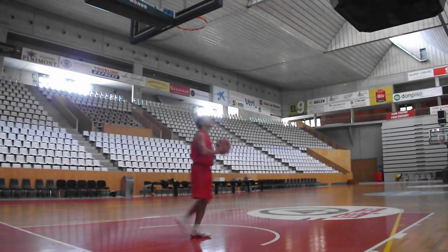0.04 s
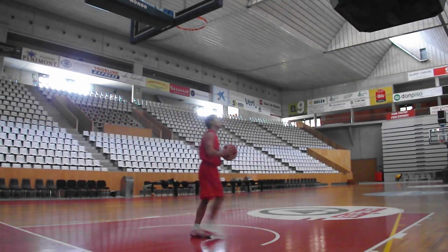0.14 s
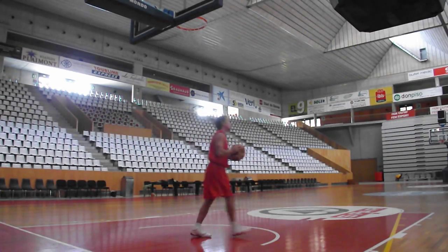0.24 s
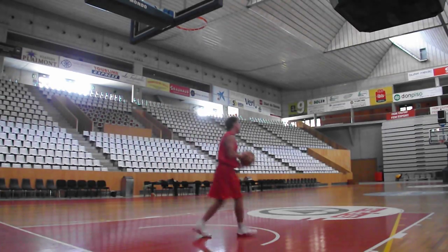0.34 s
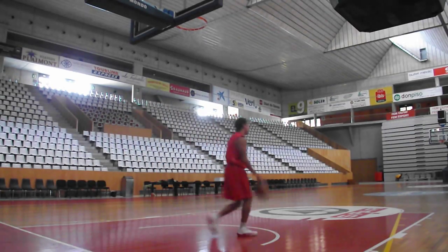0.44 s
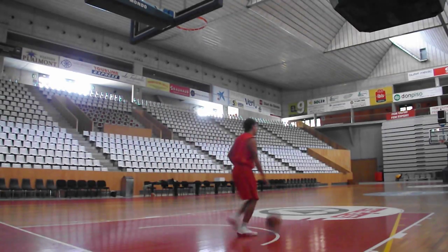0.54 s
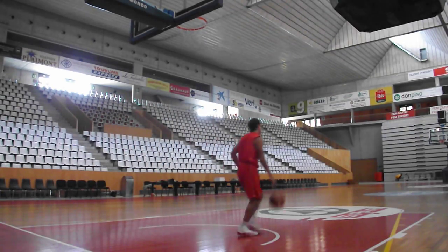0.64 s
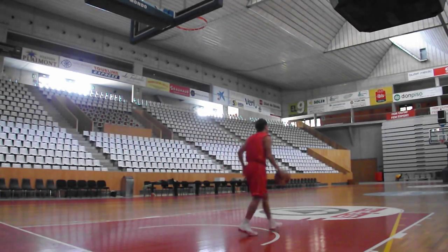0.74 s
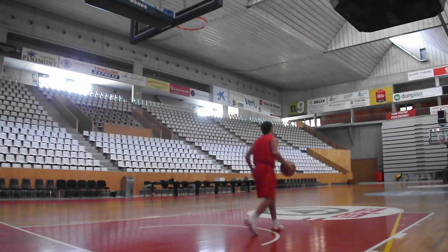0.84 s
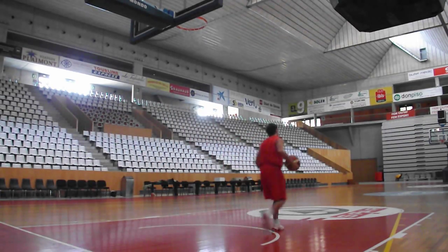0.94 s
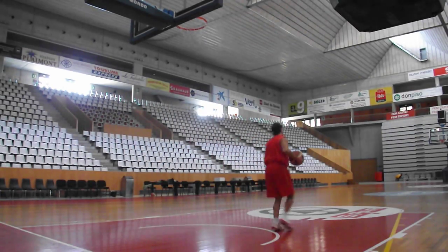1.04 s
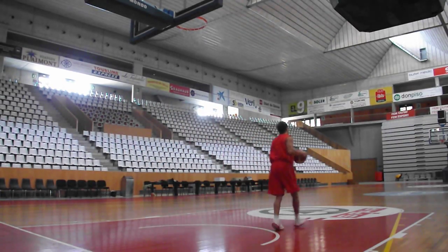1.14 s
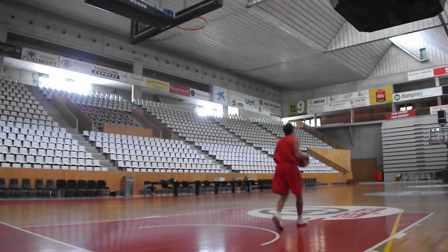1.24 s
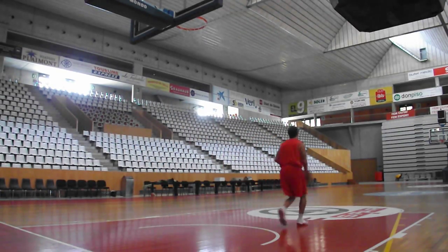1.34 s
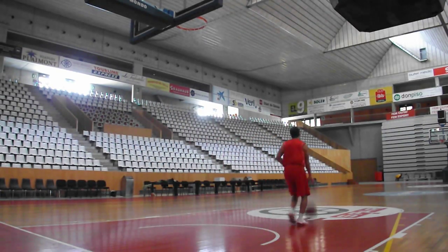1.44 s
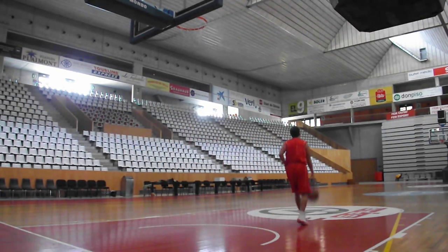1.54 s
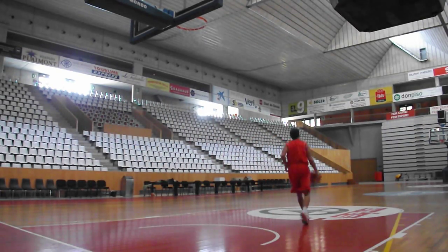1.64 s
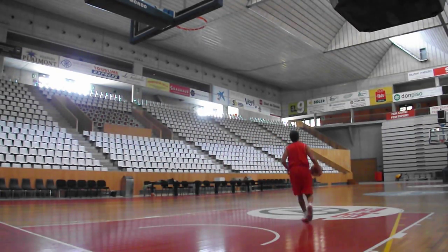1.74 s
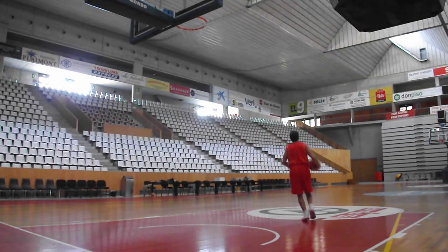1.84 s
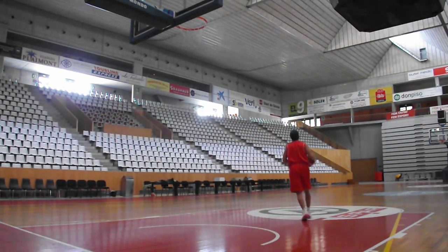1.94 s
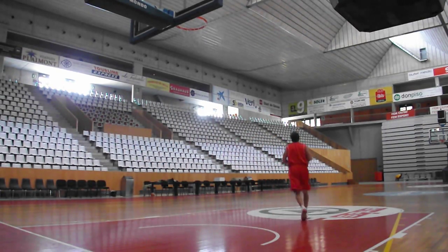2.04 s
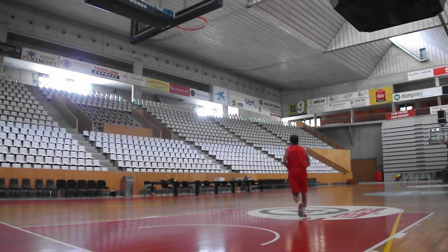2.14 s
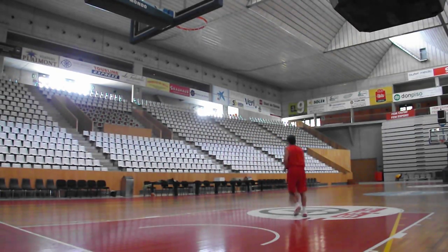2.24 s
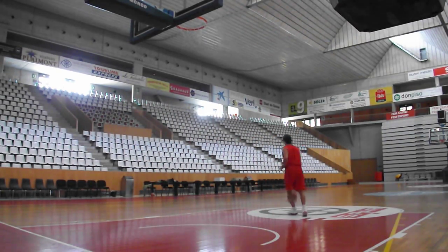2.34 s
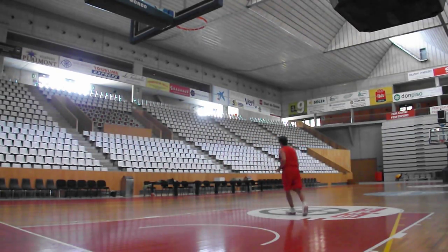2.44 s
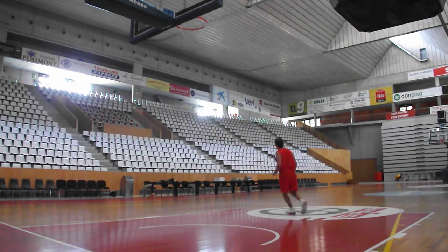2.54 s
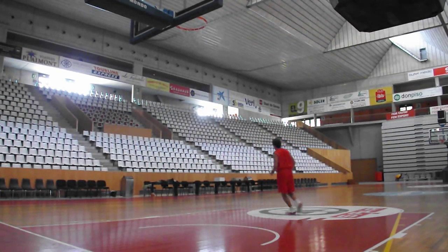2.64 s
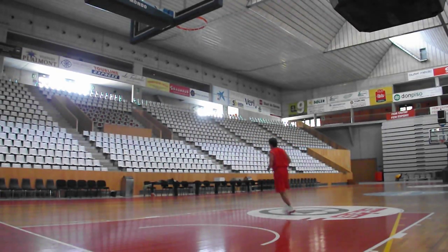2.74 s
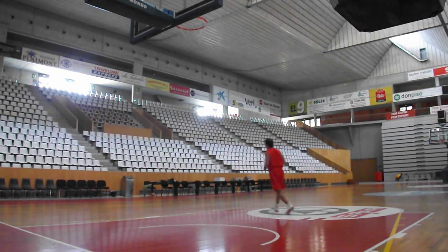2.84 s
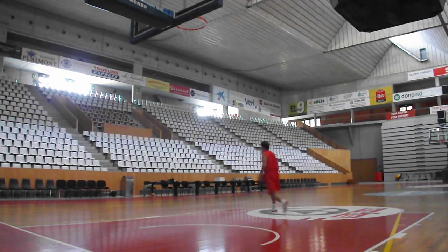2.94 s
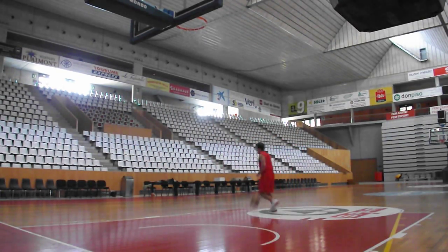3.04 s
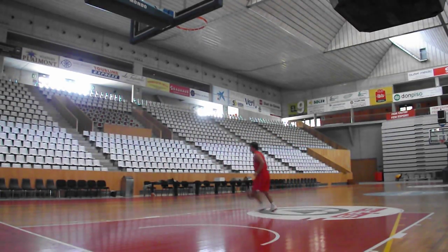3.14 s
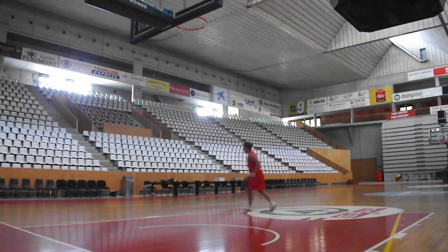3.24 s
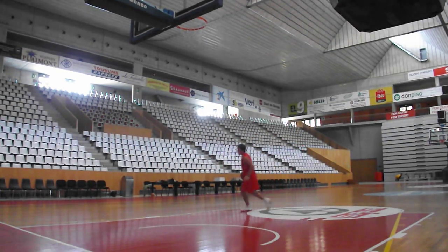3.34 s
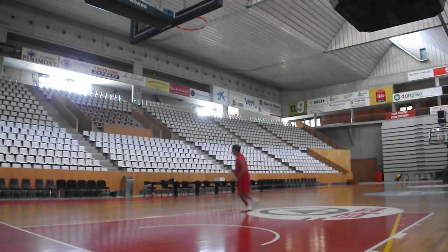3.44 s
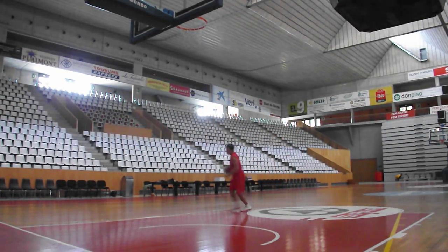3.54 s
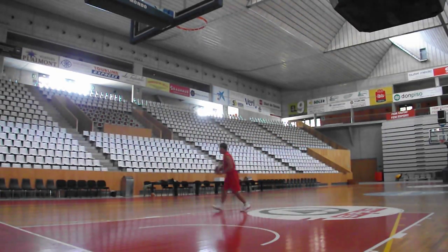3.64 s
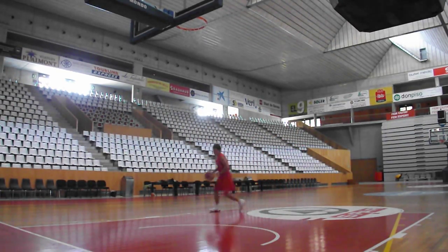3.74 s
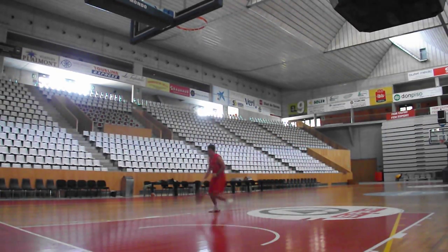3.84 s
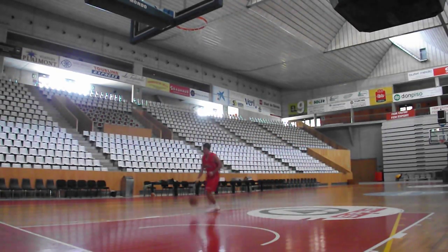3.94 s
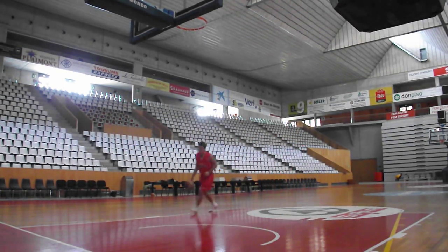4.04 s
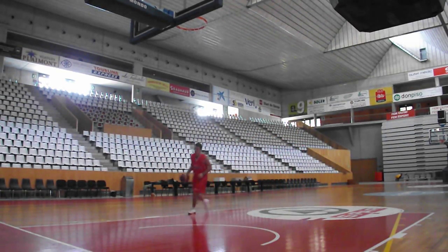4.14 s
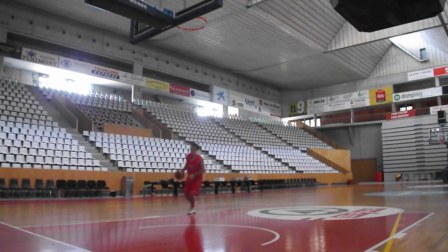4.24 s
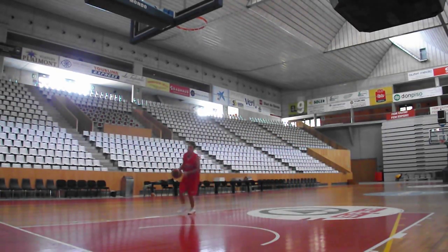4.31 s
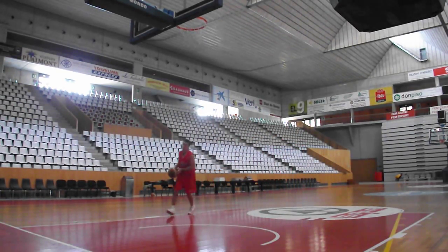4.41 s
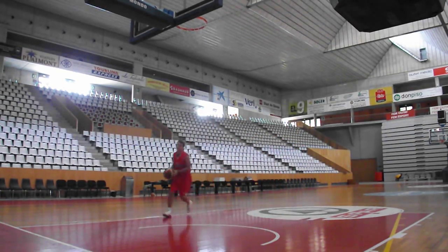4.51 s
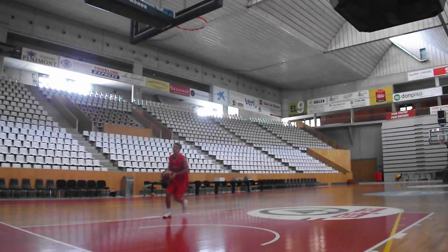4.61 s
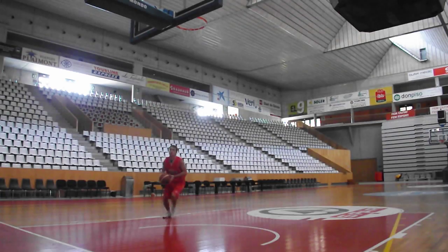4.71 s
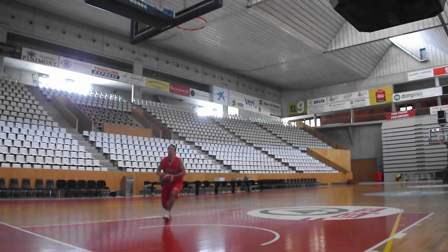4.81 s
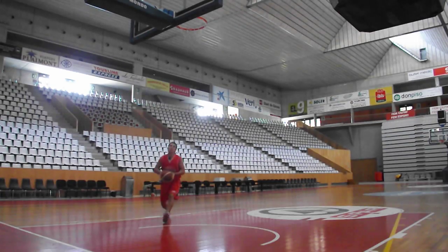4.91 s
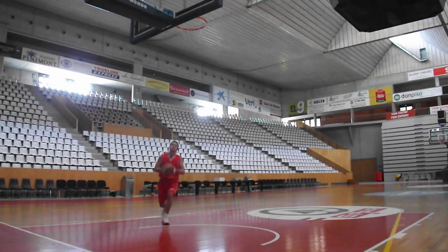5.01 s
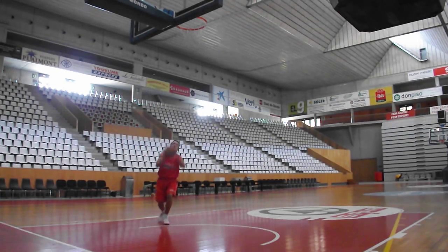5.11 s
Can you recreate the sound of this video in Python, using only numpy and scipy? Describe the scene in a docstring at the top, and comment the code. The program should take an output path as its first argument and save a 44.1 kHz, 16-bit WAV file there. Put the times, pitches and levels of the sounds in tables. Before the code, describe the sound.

A large, empty sports hall hums with steady ventilation rumble, a little hiss and the faint whine of a camera motor. In the first 0.3 seconds, soft steps tap and scuff on wooden boards. A basketball then bounces five times at a slow, fairly even pace, at about 0.6, 1.5, 2.3, 3.1 and 3.9 seconds. Each bounce is a loud, sharp rubber slap over a deep thump, with a brief ring and rattle from ball and floor. The slaps overload the microphone. Walls and roof throw back quick echoes, and the hall rings on for two to three seconds, filling the gaps. The ball moves gradually further away, so later bounces are a little less direct while the reverberation stays strong and turns slightly duller. At about 4.9 seconds the ball lands softly in the hands as the last echo fades.

```python
"""Sharp slaps over a deep thump: a basketball dribbled five times in a large, empty sports hall.
The rubber skin makes the slap; ball and sprung wooden floor flex together for the thump.
Walls and roof throw each bounce back, then the hall rings on, as the player moves further away.
Soft steps lead in and a catch ends it, over ventilation rumble and a camera motor's faint whine.
The slaps overload the microphone."""
import sys
import numpy as np
from scipy import signal
from scipy.fft import rfft, irfft
from scipy.io import wavfile

SR = 44100
rng = np.random.default_rng(int(sys.argv[2]) if len(sys.argv) > 2 else 0)


def log_audio(samples):
    """Write samples as a 16-bit WAV file to the path given in sys.argv[1]."""
    # one column per channel
    frames = np.atleast_2d(samples).T
    # limit to full scale, then quantise
    limited = np.clip(frames, -1, 1)
    pcm = np.round(limited * 32767).astype(np.int16)
    wavfile.write(sys.argv[1], SR, pcm)


N = 227952

# The bounces, before distance. Each row: start in seconds, slap in dB, slap cut-off in Hz, skin ping boost,
# thump, ring and rattle in dB, then the echo off the stands: delay in seconds, level in dB.
BOUNCES = [(0.5548, 8.5, 14000, -1, -0.5, -18.5, -14, .114, -37),
           (1.4712, 10, 14000, -1, -0.5, -25.5, -17.5, .0957, -15),
           (2.314, 10.5, 20000, -1.5, -2, -21, -16.5, 0.1, -29),
           (3.0789, 11, 18000, 3.5, -0.5, -21, -18, 0.085, -25),
           (3.9209, 11.5, 6450, -2, -1.5, -15, -11.5, 0.17, -21)]
# The player's path. Each row: time in seconds, distance from the listener in metres.
DISTANCE = [(.55, 7), (1.47, 7.6), (2.31, 9.2), (3.08, 11.1), (3.92, 11.9)]
# Tone of rubber skin hitting the boards. Each row: frequency in Hz, relative level in dB.
SLAP_COLOUR = [(60, -3), (200, 8.5), (400, -1), (600, -5), (1100, -3), (1700, 2), (2150, 4), (2550, 8.5),
               (3050, 12), (3500, 3), (4300, -5.5), (5700, -14), (8000, -23.5), (15000, -58)]
# Modes of the boards and the air in the ball. Each row: pitch in Hz, relative level in dB, t60 in seconds.
RING_MODES = [(142.8, 2, 0.14), (392, -4.5, 0.078), (500, -8.5, 0.02), (900, -39, 0.075),
              (1172, -9.5, 0.096), (1320, 3.5, 0.021), (1760, -16, 0.051), (2393, 1, 0.029),
              (2890, -3, 0.066), (3280, -0.5, 0.064)]
# Tone of the boards rattling round the impact. Each row: frequency in Hz, relative level in dB.
RATTLE_COLOUR = [(60, 6), (170, 4.5), (400, -6), (600, -1), (1100, 6.5), (1800, -1.5), (3000, -19.5),
                 (4500, -16.5), (8000, -36), (15000, -67)]
# Shoes on boards, hands on the ball. Each row: start in seconds, slap, scuff and thump in dB, thump in Hz.
TOUCHES = [(0.031, -31, -54, -57, 120), (.092, -60, -35.5, -38, 60.5), (0.308, -31, -47, -30.5, 154),
           (4.9205, -18.5, -34.5, -23, 149)]
# Slapback off the rear, side and end walls. Each row: delay in seconds, its change per metre past
# REFERENCE_M, level in dB, its change per metre, scatter in dB.
WALLS = [(.0372, -.0005, -16, -.2, -18), (.0665, -.0031, -21.5, .8, -16), (.365, .001, -37, 1.3, -12)]
# Tone of the reverb. Each row: frequency in Hz, relative level in dB.
HALL_COLOUR = [(25, 10), (52, 13), (90, -16), (160, 0.5), (250, 2), (400, -4.5), (600, 1.5), (1100, -0.5),
               (1800, -2.5), (2800, -4), (4500, -6), (7000, -7.5), (12000, -19)]
# Length of the reverb. Each row: frequency in Hz, t60 in seconds.
HALL_DECAY = [(60, 3.42), (200, 2.7), (1100, 2.99), (2800, 2.05), (5000, 1.55), (8000, 1.67), (14000, .4)]
# Broad returns off the far seats and end wall. Each row: delay and width in seconds, boost in dB,
# frequency in Hz below which the boost fades.
HALL_SWELLS = [(0.182, 0.067, 4, 4570), (.36, 0.04, 2, 25)]
# Ventilation rumble and microphone hiss. Each row: frequency in Hz, relative level in dB.
VENT_COLOUR = [(12, -43), (20, -0.5), (58, 6), (110, -13.5), (230, -17.5), (340, -24.5), (800, -26),
               (1270, -24), (1650, -22), (2050, -28), (3200, -26.5), (4400, -32), (5400, -43.5),
               (15500, -45)]
# Narrow bands of faint whine from the camera's motor. Each row: centre in Hz, width in Hz, rms level in dB.
CAMERA_WHINE = [(1460, 130, -55), (1850, 140, -56.5), (3280, 260, -73), (4300, 380, -65.5)]

HZ = np.fft.rfftfreq(2 ** 18, 1 / SR)  # frequency grid for filters
AGE = np.arange(SR // 4) / SR  # seconds since a hit
REFERENCE_M = 7  # the direct sound has unity gain at this distance
THUMP_HZ = 88.2
CLACK_S, CLACK_DB, CLACK_SCATTER_DB = .012, -20.5, -22  # the boards clack back once after a bounce
ROOF_S, ROOF_S_PER_M, ROOF_DB = .178, -.0012, -11.5  # the roof returns only the thump
# Further out on the court, the reverb is duller and fills sooner.
HALL_DB, TREBLE_DB, TREBLE_DB_PER_M, EARLY_DB, EARLY_DB_PER_M = -6.5, 2, -0.56, -4.5, 1
# Stray reflections flutter off the seat rows, the later ones fainter.
FLUTTER_FROM_S, FLUTTER_TO_S = 0.055, .25
FLUTTER_DB, FLUTTER_DB_PER_S, FLUTTER_SPREAD_DB = -27.5, -23, 3


def dribble():
    """Each bounce and the room's answer: the direct hit fades with distance, the hall stays strong."""
    out = np.zeros(N)
    for start, slap_db, top_hz, ping_db, thump_db, ring_db, rattle_db, stands_s, stands_db in BOUNCES:
        metres = np.interp(start, *np.transpose(DISTANCE))
        further_m = metres - REFERENCE_M
        low_end = amp(thump_db) * thump(THUMP_HZ)
        bounce = amp(slap_db) * slap(ping_db=ping_db, top_hz=top_hz) + low_end + amp(ring_db) * ring()
        click = amp(slap_db) * slap(ping_db=ping_db - 1, top_hz=top_hz)  # most ping reaches the walls
        direct = bounce + amp(rattle_db) * rattle()
        add(direct, CLACK_S, amp(CLACK_DB) * scattered(click, CLACK_SCATTER_DB))
        add(out, start, direct * REFERENCE_M / metres)
        add(out, start, reflections(click, further_m, stands_s, stands_db))
        add(out, start + ROOF_S + ROOF_S_PER_M * further_m, amp(ROOF_DB) * low_end)
        treble_db = TREBLE_DB + TREBLE_DB_PER_M * further_m
        early_db = EARLY_DB + EARLY_DB_PER_M * further_m
        add(out, start, amp(HALL_DB) * hall(bounce, treble_db, early_db))
    return out


def slap(ping_db=0, ping_hz=2950, ping_width_hz=400, top_hz=SR):
    """The attack: a click of peak 1 that pings for a few cycles at the skin's resonance."""
    hz = np.fft.rfftfreq(len(AGE) - 1, 1 / SR)
    boost_db = ping_db * np.exp(-((hz - ping_hz) / ping_width_hz) ** 2)
    gain = amp(along(SLAP_COLOUR, hz) + boost_db) / (1 + (hz / top_hz) ** 2)
    cepstrum = irfft(np.log(gain))
    half = len(cepstrum) // 2
    cepstrum[1:half] *= 2  # minimum phase packs the energy at the front
    cepstrum[half + 1:] = 0
    click = np.append(irfft(np.exp(rfft(cepstrum))), 0)
    return click / np.abs(click).max()


def thump(hz, swell_s=0.0044, lowest_hz=22):
    """The weight: ball and sprung floor flex together in a push that is gone in two cycles."""
    push = AGE / swell_s * np.exp(1 - AGE / swell_s) * np.cos(2 * np.pi * hz * AGE)
    low_cut = signal.butter(1, lowest_hz, "high", fs=SR)  # slow motion radiates poorly
    return signal.lfilter(*low_cut, push)


def ring(vary_db=1):
    """Ball and boards ring on, each mode struck a little differently every time."""
    return sum(amp(db + vary_db * rng.standard_normal() - 60 * AGE / t60) * np.sin(2 * np.pi * hz * AGE)
               for hz, db, t60 in RING_MODES)


def rattle(t60=0.083):
    """A short shiver of the floorboards."""
    return noise(amp(along(RATTLE_COLOUR, HZ)))[:len(AGE)] * amp(-60 * AGE / t60)


def reflections(click, further_m, stands_s, stands_db, stands_scatter_db=-22, flutter_scatter_db=-18,
                flutter_count=12):
    """Slapback off walls, stands and seat rows; the wall echoes shift as the player moves out."""
    out = np.zeros(SR)
    for near_s, s_per_m, db, db_per_m, scatter_db in WALLS:
        delay = near_s + s_per_m * further_m
        add(out, delay, amp(db + db_per_m * further_m) * echo(click, delay, scatter_db))
    add(out, stands_s, amp(stands_db) * echo(click, stands_s, stands_scatter_db))
    for delay in rng.uniform(FLUTTER_FROM_S, FLUTTER_TO_S, flutter_count):
        db = FLUTTER_DB + FLUTTER_DB_PER_S * delay + FLUTTER_SPREAD_DB * rng.standard_normal()
        add(out, delay, amp(db) * echo(click, delay, flutter_scatter_db))
    return out


def echo(click, delay, scatter_db, top_hz=9800, halved_at_s=0.14):
    """One reflection: smeared by its wall, and dulled by the air the longer it travels."""
    cutoff_hz = np.clip(top_hz / (1 + delay / halved_at_s), 1000, SR / 3)
    return signal.lfilter(*signal.butter(2, cutoff_hz, fs=SR), scattered(click, scatter_db))


def scattered(click, scatter_db, t60=0.018):
    """An uneven surface smears a click over a few milliseconds."""
    smear = amp(scatter_db - 60 * AGE / t60) * rng.standard_normal(len(AGE))
    return click + signal.fftconvolve(click, smear)[:len(AGE)]


def hall(sound, treble_db=0, early_db=0, treble_hz=6000, gap_s=0.041, gap_db=-9, build_s=0.22,
         grain_db=6, mixing_s=0.37):
    """Reverb: faint until the first wall answers, grainy at first, swelling as far surfaces join in."""
    hz, frame_s, spectrum = signal.stft(rng.standard_normal(SR * 2), SR, nperseg=512)
    hz = hz[:, None]
    swell_db = sum(db * np.exp(-((frame_s - delay) / width) ** 2) * hz / np.hypot(hz, above_hz)
                   for delay, width, db, above_hz in HALL_SWELLS)
    colour_db = along(HALL_COLOUR, hz) + treble_db * np.minimum(hz / treble_hz, 1) ** 2
    decay_db = -60 * frame_s / along(HALL_DECAY, hz)
    tail = signal.istft(spectrum * amp(colour_db + swell_db + decay_db), SR, nperseg=512)[1]
    t = np.arange(len(tail)) / SR
    clumps = np.interp(t, np.linspace(0, 2, num=1000), rng.uniform(-1, 1, size=1000))
    onset_db = gap_db * (t < gap_s) + early_db * np.clip(2 - t / build_s * 2, 0, 1)
    shape = amp(onset_db + grain_db * clumps * np.exp(-t / mixing_s))  # echoes clump until they mix
    energy = np.sum((shape * amp(-60 * t / 2)) ** 2)  # under a nominal t60 of 2 s
    return signal.fftconvolve(sound, tail * shape / np.sqrt(energy))


def steps_and_catch(hall_db=-6):
    """Light steps scuff the boards, and the ball lands softly in the hands."""
    out = np.zeros(N)
    for start, slap_db, scuff_db, thump_db, thump_hz in TOUCHES:
        low_end = amp(thump_db) * thump(thump_hz, swell_s=0.0027)
        touch = amp(slap_db) * slap(top_hz=6000) + amp(scuff_db) * scuff() + low_end
        add(out, start, touch)
        add(out, start, amp(hall_db) * hall(touch))
    return out


def scuff(rise_s=.006, t60=.09):
    """A sole or a palm rubs briefly: soft noise with the tone of a dull slap."""
    rub = signal.fftconvolve(rng.standard_normal(len(AGE)), slap(top_hz=2980))[:len(AGE)]
    return unit(rub) * (1 - np.exp(-AGE / rise_s)) * amp(-60 * AGE / t60)


def ventilation(level_db=-39):
    """The room tone: a steady rumble under a little microphone hiss."""
    return amp(level_db) * noise(amp(along(VENT_COLOUR, HZ)))


def camera_whine():
    """The camera's motor whines faintly in a few narrow resonances."""
    return sum(amp(db) * noise(1 / (1 + (2 * (HZ - hz) / width) ** 2)) for hz, width, db in CAMERA_WHINE)


def amp(db):
    """Decibels to gain."""
    return 10 ** (np.asarray(db) / 20)


def unit(x):
    """x at rms 1."""
    return x / np.sqrt(np.mean(x ** 2) + 1e-20)


def along(points, hz):
    """Read a curve of (Hz, value) points on a log frequency axis."""
    point_hz, values = np.transpose(points)
    return np.interp(np.log(hz + 1), np.log(point_hz), values)


def add(track, start_s, sound):
    """Mix a sound into the track from start_s on."""
    start = max(0, round(start_s * SR))
    part = sound[:max(0, len(track) - start)]
    track[start:start + len(part)] += part


def filtered(x, gain):
    """x through an EQ curve given on the HZ grid."""
    return irfft(rfft(x, 2 * (len(HZ) - 1)) * gain)[:len(x)]


def noise(gain):
    """Noise of rms 1, coloured by an EQ curve."""
    return unit(filtered(rng.standard_normal(N), gain))


def scene():
    """The court as heard from the baseline, in mono."""
    return (dribble() + steps_and_catch() + camera_whine() + ventilation())[None]


def record(dry, top_hz=16300):
    """The slaps overload the microphone into hard clipping; everything above top_hz is cut."""
    return filtered(np.clip(dry[0], -1, 1), HZ < top_hz)[None]


dry = scene()
out = record(dry)
log_audio(out)
```